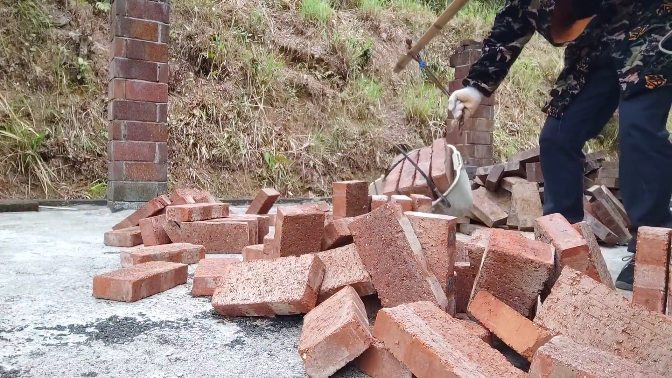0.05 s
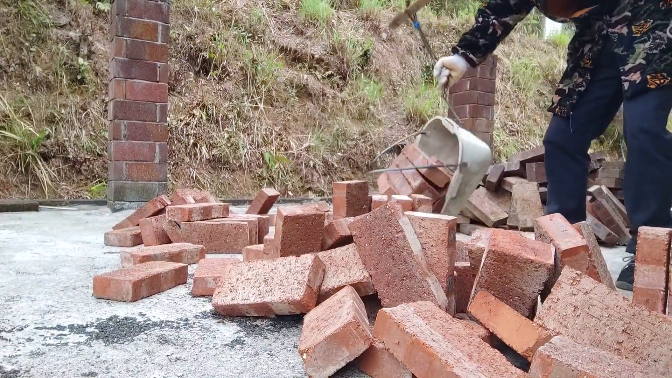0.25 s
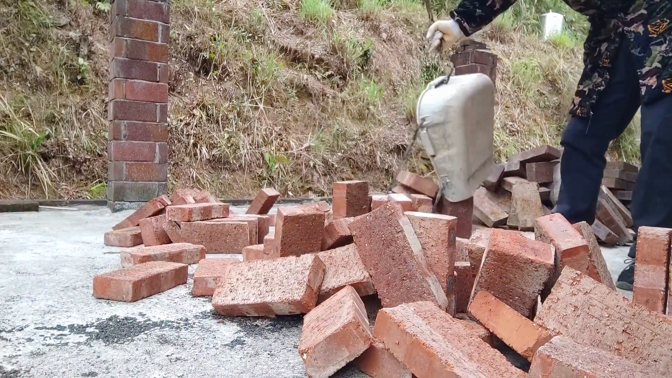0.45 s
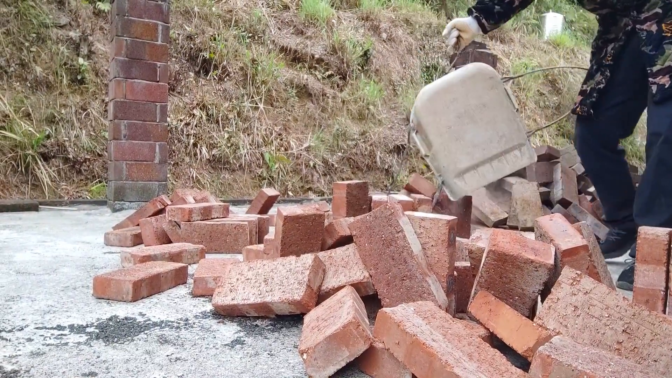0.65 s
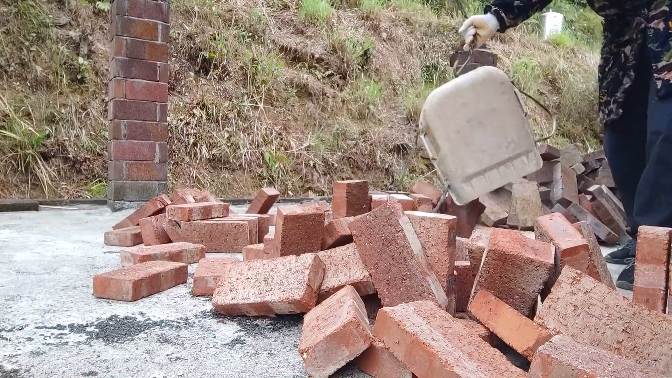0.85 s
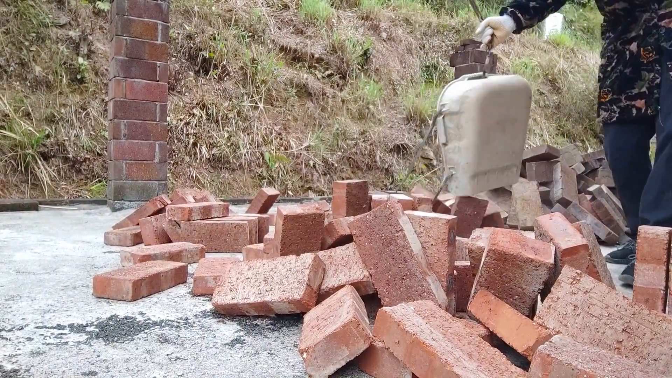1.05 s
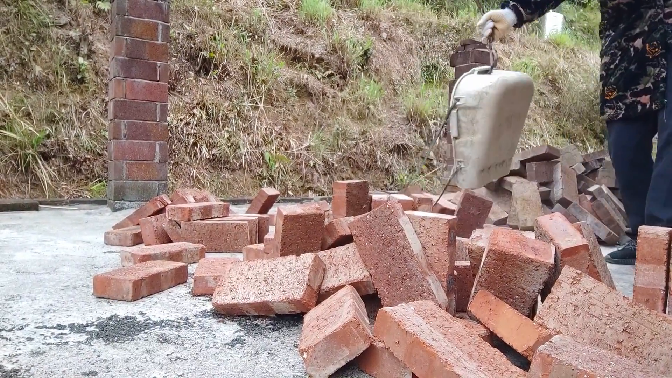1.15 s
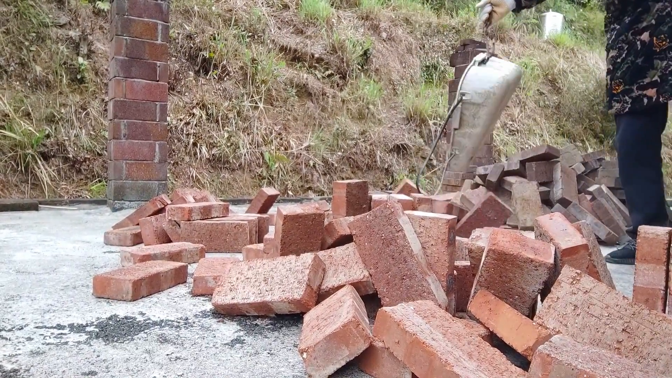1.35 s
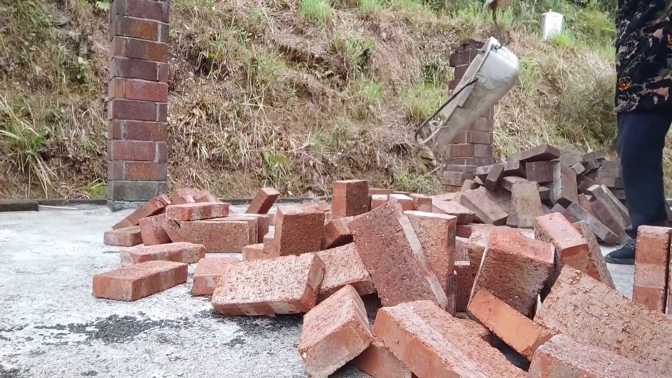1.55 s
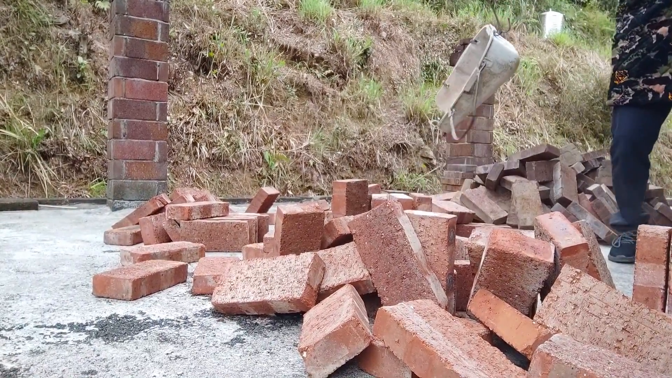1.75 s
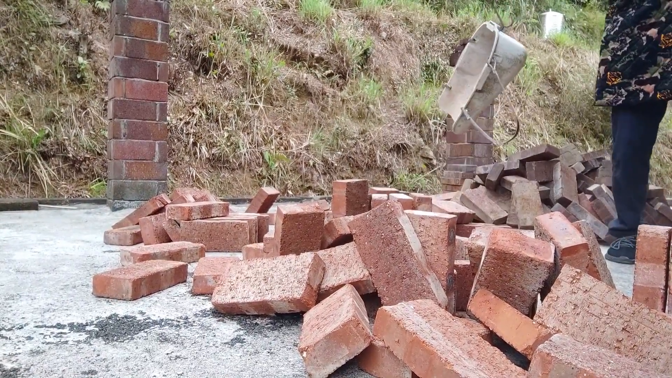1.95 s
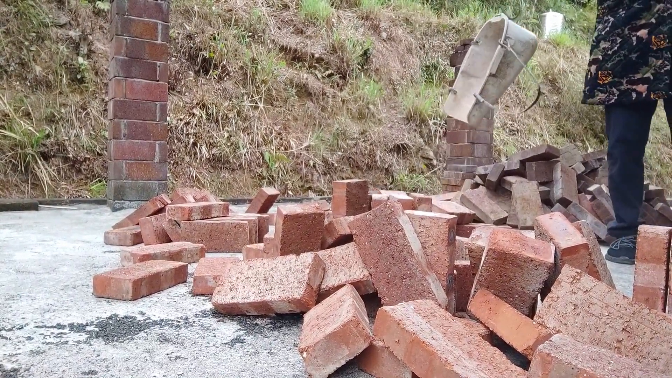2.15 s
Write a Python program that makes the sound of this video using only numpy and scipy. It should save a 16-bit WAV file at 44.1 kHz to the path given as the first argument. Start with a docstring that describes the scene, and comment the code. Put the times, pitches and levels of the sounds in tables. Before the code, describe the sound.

Bricks dumped from a basket: a short rough slide with chattering edges, a dense hard clatter, then separate dull knocks, faint ringing clinks, crumbs and hollow basket rumble, outdoors, close, slightly right, with low wind.

```python
"""Roofed yard: a basket of clay bricks is tipped onto a brick pile, a little to the right.
The load scrapes and groans out (filtered grains, sagging tones); bricks clink and thud (decaying modes, noise).
Grit patters after them and the hollow basket rumbles (random grains through resonances).
A light wind buffets the microphone (low noise, puffs) over still air; noise tails give the reflections."""
import sys
import numpy as np
from scipy import signal
from scipy.fft import rfft, irfft
from scipy.io import wavfile

SR = 44100
rng = np.random.default_rng(int(sys.argv[2]) if len(sys.argv) > 2 else 0)


def pcm_store(signal):
    """Save signal as 16-bit PCM."""
    levels = np.round(np.clip(np.atleast_2d(signal), -1, 1) * 32767)
    wavfile.write(sys.argv[1], SR, levels.astype(np.int16).T)


N = 94815
T = np.arange(N) / SR
ONE_S = T[:SR]


def from_db(db):
    """Decibels to gain."""
    return 10 ** (np.asarray(db) / 20)


def rms_one(x):
    """Scale to an rms of 1."""
    return x / np.sqrt(np.mean(x ** 2) + 1e-20)


def level(rows):
    """Gain over time from (time_s, level_db) rows, linear in dB between them."""
    return from_db(np.interp(T, *np.transpose(rows)))


def at_hz(points, hz):
    """Interpolate (freq_hz, value) rows on a log-frequency axis."""
    freq_hz, values = np.transpose(points)
    return np.interp(np.log(np.maximum(hz, 1)), np.log(freq_hz), values)


def colour(x, spectrum):
    """Weight the spectrum of x by (freq_hz, level_db) rows; rms 1."""
    size = x.shape[-1]
    gain = from_db(at_hz(spectrum, np.fft.rfftfreq(size, 1 / SR)))
    return rms_one(irfft(rfft(x) * gain, size))


def add(out, start_s, x):
    """Mix x into out from start_s on."""
    i = max(int(start_s * SR), 0)
    out[i:i + len(x)] += x[:N - i]


def low_pass(x, hz):
    """Second-order low-pass."""
    return signal.sosfilt(signal.butter(2, min(hz, SR / 3), fs=SR, output="sos"), x)


def waver(hz):
    """Random fluctuation, low-passed at hz; rms 1."""
    return rms_one(low_pass(rng.standard_normal(N), hz))


def dying_noise(spectrum, t60s):
    """One second of coloured noise, rms 1 before decay; each octave band dies at its own rate."""
    bins = rfft(colour(rng.standard_normal(SR), spectrum))
    hz = np.fft.rfftfreq(SR, 1 / SR)
    octave = np.clip(np.round(np.log2(np.maximum(hz, 1) / 100)), 0, 7)
    out = np.zeros(SR)
    for k in range(8):
        band = irfft(bins * (octave == k), SR)
        out += band * from_db(-60 * ONE_S / at_hz(t60s, 100 * 2 ** k))
    return out


def grains(per_s, spread_db):
    """Tiny contacts: impulses at random times, of uneven size and random sign."""
    sizes = from_db(spread_db * np.minimum(rng.exponential(1, N), 4))
    hits = rng.random(N) < per_s / SR
    return hits * sizes * rng.choice([-1, 1], N) + 1e-18


def resonate(x, rows):
    """Parallel resonances of alternating sign from (freq_hz, width_hz, level_db) rows; rms 1."""
    out = np.zeros(N)
    for k, (hz, width_hz, db) in enumerate(rows):
        b, a = signal.iirpeak(hz, hz / width_hz, fs=SR)
        out += (-1) ** k * from_db(db) * rms_one(signal.lfilter(b, a, x))
    return rms_one(out)


# still-air spectrum: freq_hz, level_db
AIR_SPECTRUM = [(100, 3.5), (500, 7.5), (1200, -1.5), (3000, -4), (7500, -3), (9000, -17.5), (13000, -5),
                (15500, -30.5)]
AIR_DB = -57


def still_air():
    """Steady coloured noise, independent in each channel."""
    return from_db(AIR_DB) * colour(rng.standard_normal((2, N)), AIR_SPECTRUM)


# wind course: time_s, level_db (before WIND_GAIN_DB)
WIND_LEVEL = [(0, -37.5), (.1, -44), (.3, -45), (.7, -38.5), (1.1, -34), (1.4, -34), (1.6, -35.5),
              (1.85, -30), (1.97, -38.5), (2.15, -40)]
# wind spectrum: freq_hz, level_db
WIND_SPECTRUM = [(8, -18.5), (18, -6), (30, -2), (70, -4), (120, -10.5), (250, -24), (600, -50),
                 (2000, -74.5)]
# puffs in the right channel: centre_s, peak_db
PUFFS = [(1.391, -10), (1.622, -6.5), (1.646, -13), (1.787, -11.5)]
WIND_GAIN_DB, WIND_SHARED_GAIN, PUFF_WIDTH_S = 9.5, 0.32, 0.0021


def wind():
    """Turbulence on the microphone: low noise partly common to both channels, puffs that pop on the right."""
    white = rng.standard_normal((2, N)) + WIND_SHARED_GAIN * rng.standard_normal(N)
    out = level(WIND_LEVEL) * from_db(WIND_GAIN_DB) * colour(white, WIND_SPECTRUM)
    for centre_s, peak_db in PUFFS:
        u = ((T - centre_s) / PUFF_WIDTH_S) ** 2
        out[1] += from_db(peak_db) * (1 - u) * np.exp(-u / 2)
    return out


# rumble of the handled basket: time_s, level_db
RUMBLE_LEVEL = [(0, -42), (.1, -43), (.2, -31), (.4, -28), (.52, -28.5), (.58, -24), (.76, -36),
                (.85, -29.5), (1.0, -28.5), (1.2, -31), (1.28, -27), (1.42, -29.5), (1.5, -36.5),
                (1.62, -25), (1.75, -32), (1.88, -30.5), (1.97, -52), (2.15, -33.5)]
# resonances of the hollow basket: freq_hz, width_hz, level_db
BASKET_RESONANCES = [(78.2, 73, -3), (132, 66, 0.5), (190.5, 49, -0.5), (272, 110, -5), (375, 92, -7),
                     (430, 67, -12)]
FLEXES_PER_S = 460


def basket():
    """Soft flexes of the basket wall excite its low resonances."""
    flexes = grains(FLEXES_PER_S, spread_db=3.5)
    hollow = rms_one(low_pass(resonate(flexes, BASKET_RESONANCES), hz=515))
    return level(RUMBLE_LEVEL) * hollow


# run of grit and crumbs: time_s, level_db
GRIT_LEVEL = [(0, -68), (.2, -53.5), (.5, -45), (.6, -46), (.76, -49.5), (.82, -39), (.92, -47),
              (1.03, -47), (1.16, -42.5), (1.205, -36.5), (1.25, -41.5), (1.33, -42), (1.41, -50.5),
              (1.48, -48), (1.56, -50), (1.7, -59.5), (1.9, -70.5)]
# bricks ringing under the grit: freq_hz, width_hz, level_db
GRIT_RESONANCES = [(2310, 180, -2), (2861, 41, 1), (3082, 50, -6.5), (4430, 250, -12), (5656, 220, -13.5)]
# grit hiss spectrum: freq_hz, level_db
GRIT_SPECTRUM = [(400, 8), (1300, 2), (2600, 1.5), (3700, -10.5), (5500, -19), (7800, -11.5), (9000, -25),
                 (14000, -17.5)]
GRIT_PER_S, GRIT_SPREAD_DB, GRIT_HISS_DB = 1800, 1.5, -0.5
GRIT_FLICKER_RMS_DB, GRIT_FLICKER_HZ = 3.5, 35.3


def grit():
    """Crumbs patter in uneven spurts on the bricks and keep them ringing faintly."""
    spurts = from_db(GRIT_FLICKER_RMS_DB * waver(GRIT_FLICKER_HZ))
    crumbs = grains(GRIT_PER_S, GRIT_SPREAD_DB) * spurts
    ringing = resonate(crumbs, GRIT_RESONANCES)
    hiss = from_db(GRIT_HISS_DB) * colour(crumbs, GRIT_SPECTRUM)
    return level(GRIT_LEVEL) * (ringing + hiss)


# short rubs of basket and bricks: peak_s, length_s (peak to -17 dB), level_db, centre_hz,
# half_width_octaves (to -3 dB)
RUB_EVENTS = [(0.098, 0.043, -41.5, 596, 0.58), (0.63, 0.02, -36, 1290, 0.65),
              (1.196, 0.024, -44, 12400, 1), (1.2, 0.0057, -27, 1380, 0.18), (1.484, 0.052, -48, 4450, 0.5),
              (1.596, 0.015, -43, 1550, 0.65)]
SCRAPE_GRAINS_PER_S, SCRAPE_SPREAD_DB = 5000, 2


def rubs():
    """Friction: brief grainy swells, each in its own register."""
    out, hz = np.zeros(N), np.geomspace(50, 16000, 60)
    for peak_s, length_s, db, centre_hz, half_width_octaves in RUB_EVENTS:
        offset = np.log2(hz / centre_hz) / half_width_octaves
        spectrum = np.transpose([hz, np.maximum(-3 * offset ** 2, -60)])
        friction = colour(grains(SCRAPE_GRAINS_PER_S, SCRAPE_SPREAD_DB), spectrum)
        swell = np.exp(-2 * ((T - peak_s) / length_s) ** 2)
        out += from_db(db) * swell * friction
    return out


# load scraping along the basket wall: time_s, level_db
SLIDE_LEVEL = [(0, -48), (.185, -47.5), (.21, -32), (.24, -26), (.275, -26), (.3, -26.5), (.33, -23),
               (.354, -29.5), (.372, -23.5), (.395, -26), (.415, -26.5), (.435, -31), (.48, -28),
               (.52, -46.5), (.56, -76), (.7, -63)]
# scrape spectrum: freq_hz, level_db
SCRAPE_SPECTRUM = [(150, -9.5), (350, 10.5), (800, -3), (1500, -4.5), (2400, -2), (3500, -6.5), (5000, -17),
                   (9000, -27.5), (13000, -27.5), (16000, -20)]
# brick edges chattering: freq_hz, width_hz, level_db
RATTLE_RESONANCES = [(1340, 110, 1), (1840, 180, -3.5), (2330, 150, -0.5), (2800, 170, -7),
                     (4300, 200, -10.5)]
# stick-slip groans of the basket: start_s, length_s (release starts halfway), level_db, start_hz,
# sag_octaves_per_s
SLIP_EVENTS = [(0.122, 0.14, -33.5, 525, 5.5), (.232, 0.024, -18.5, 511, 7), (0.261, 0.039, -21, 399.6, 5),
               (0.309, 0.073, -15, 437.3, 7), (0.358, 0.024, -10.5, 413.3, 7.5),
               (0.385, 0.011, -9.5, 317, 6.5), (0.776, 0.15, -31, 375, 0), (0.882, 0.023, -21, 350, 3.5),
               (0.942, 0.033, -29.5, 375, 1), (1.012, 0.04, -30.5, 352, -3), (1.272, 0.048, -28.5, 430, 2)]
RATTLE_PER_S, RATTLE_SPREAD_DB, RATTLE_DB = 220, 4.5, -10
CATCH_RMS_DB, CATCH_HZ = 2.5, 130
SLIP_PITCH_JITTER, SLIP_FLUTTER = .08, .35  # rms, relative
SLIP_ATTACK_S, SLIP_RELEASE_S = 0.0059, 0.014


def slide():
    """Rough clay scrapes, catches and chatters out of the basket, which groans with each slip."""
    rattle = from_db(RATTLE_DB) * resonate(grains(RATTLE_PER_S, RATTLE_SPREAD_DB), RATTLE_RESONANCES)
    catches = from_db(CATCH_RMS_DB * waver(CATCH_HZ))
    scrape = colour(catches * grains(SCRAPE_GRAINS_PER_S, SCRAPE_SPREAD_DB), SCRAPE_SPECTRUM)
    out = level(SLIDE_LEVEL) * (scrape + rattle)
    t = T[:SR // 4]
    for start_s, length_s, db, start_hz, sag in SLIP_EVENTS:
        wobble, flutter = rms_one(low_pass(rng.standard_normal((2, len(t))), hz=154))
        pitch_hz = start_hz * 2 ** (-sag * t) * (1 + SLIP_PITCH_JITTER * wobble)
        attack = np.minimum(t / SLIP_ATTACK_S, 1)
        release = np.exp(-np.maximum(t - length_s / 2, 0) / SLIP_RELEASE_S)
        groan = (1 + SLIP_FLUTTER * flutter) * np.sin(2 * np.pi * np.cumsum(pitch_hz) / SR)
        add(out, start_s, from_db(db) * attack * release * groan)
    return out


# brick on brick: start_s, ring_db, pitch_factor, t60_s, tilt_db_per_octave, crack_db
CLINK_EVENTS = [(0.0367, -32, .9, 0.033, -4, -44), (0.2088, -36, .8, 0.02, 0, -35),
                (0.2374, -15.5, 1.4, 0.023, 6, -34.5), (0.2601, -29, 1.1, 0.023, 2, -31),
                (0.3095, -13, 0.95, 0.034, 4, -25.5), (0.3259, -17.5, 1.04, 0.017, 17, -22.5),
                (0.361, -18.5, 0.9, 0.026, -5, -21.5), (0.373, -13.5, 0.95, 0.033, 7, -33),
                (0.387, -23, 0.96, .025, 2, -19.5), (0.4257, -2.5, .99, 0.069, -20, -10.5),
                (0.4355, -6, 0.98, .05, -1.5, -17), (0.443, -13, 1.15, 0.05, -2, -19),
                (0.4506, -14.5, 1.2, 0.058, -2, -25), (0.6441, -31, 1.0, 0.22, 7, -35),
                (0.949, -43.5, 1.18, 0.32, 3, -43), (1.0291, -35.5, .6, 0.07, -25, -46.5),
                (1.114, -36, 1.28, 0.14, -4, -34.5), (1.197, -32.5, 1.18, 0.13, 13, -29),
                (1.218, -32, 1.25, 0.043, 4.5, -42.5), (1.2913, -27, 0.94, 0.27, 8.5, -34.5),
                (1.3335, -17.5, 0.908, 0.12, 17, -29.5), (1.5068, -24, 0.99, 0.2, -1, -32.5),
                (1.6583, -27.5, 1.222, 0.1, -11, -37.5)]
# brick modes: freq_hz (before pitch_factor), level_db (re ring_db)
BRICK_MODES = [(1860, -12), (1950, -14.5), (2379, -3), (2435, -23.5), (2880, -19), (3280, -24.5)]
# crack spectrum: freq_hz, level_db
CRACK_SPECTRUM = [(500, -9), (1100, -1), (2000, 1), (3000, 0), (4000, -18), (8000, -38), (15000, -37)]
TILT_PIVOT_HZ = 2379
CRACK_T60_S, SNAP_T60_S, SNAP_GAIN = 0.028, .012, 1.2
ROCKING_RMS, ROCKING_HZ = .22, 90
CLINK_RISE_S = 0.00067


def clinks():
    """A snap and gritty crack together with the ringing modes of a brick, rough as it rocks on its neighbours."""
    out, t = np.zeros(N), ONE_S
    contact = from_db(-60 * t / CRACK_T60_S) + SNAP_GAIN * from_db(-60 * t / SNAP_T60_S)
    rise = 1 - np.exp(-(t / CLINK_RISE_S) ** 2)
    for start_s, ring_db, pitch, t60_s, tilt, crack_db in CLINK_EVENTS:
        ring = np.zeros(SR)
        for hz, mode_db in BRICK_MODES:
            tilt_db = tilt * np.log2(hz / TILT_PIVOT_HZ)
            decay = from_db(ring_db + mode_db + tilt_db - 60 * t / t60_s)
            ring += decay * np.sin(2 * np.pi * hz * pitch * t + rng.uniform(0, np.pi))
        crack = colour(rng.standard_normal(SR), CRACK_SPECTRUM) * from_db(crack_db) * contact
        rocking = 1 + ROCKING_RMS * waver(ROCKING_HZ)[:SR]
        add(out, start_s, (ring * rocking + crack) * rise)
    return out


# dull landings and knocks: start_s, level_db (body and clatter), bright_hz (low-pass), pitch_factor,
# clatter_offset_db (added to CLATTER_DB)
THUD_EVENTS = [(0.051, -22.5, 495, 1.08, 4.5), (0.151, -24.5, 1200, 1.34, -8), (0.4217, -5, 500, 0.96, -4),
               (0.4264, -10.5, 2960, 2.53, -1.5), (0.4365, -3, 1800, 0.93, -1.5),
               (0.4653, -0.5, 995, 0.925, -1.5), (0.4812, 0, 680, .95, -2.5), (0.645, 0, 1200, 1.066, -2),
               (0.983, -10, 220, 1.08, -4), (1.0651, -0.5, 970, 1.04, -1.5),
               (1.1128, -6.5, 1800, 1.16, 0.5), (1.1534, -4, 1280, 0.83, -2),
               (1.2392, -1.5, 239, 0.98, -0.5), (1.264, -15.5, 1120, 1.43, 3.5),
               (1.305, -7, 250, 0.96, 2.5), (1.329, -2.5, 1900, 1.016, -0.5),
               (1.5052, -17.5, 1300, 2.5, -5.5), (1.549, -6.5, 250, 0.94, -1),
               (1.6571, 0.5, 1610, 1.12, -5.5), (1.784, -16, 247, 1.2, -6), (1.826, -8, 120, 0.6, -18)]
# heavy, well damped knock: freq_hz (before pitch_factor), level_db, t60_s
KNOCK_MODES = [(134.5, -1.5, 0.046), (200.2, 2, 0.061), (299.6, 1.5, 0.033), (430, -7, 0.039),
               (653, -4, 0.018), (879, -4, 0.017), (1200, -10, 0.013), (2500, -22.5, 0.012)]
# pile shudder spectrum: freq_hz, level_db
CLATTER_SPECTRUM = [(60, -20), (130, -4.5), (250, 4.5), (500, 1.5), (850, -0.5), (1400, -11.5),
                    (2800, -17.5), (4000, -27.5), (15000, -43.5)]
# pile shudder decay: freq_hz, t60_s
CLATTER_DECAY = [(100, 0.096), (400, 0.11), (1000, 0.075), (3000, 0.086), (12000, .05)]
BODY_DB, CLATTER_DB, CLATTER_RISE_S = -5.5, -6.5, 0.0055


def thuds():
    """Each landing rings damped modes and shakes the pile; each has its own brightness, from dull to clear."""
    out, t = np.zeros(N), ONE_S
    for start_s, db, bright_hz, pitch, clatter_offset_db in THUD_EVENTS:
        body = np.zeros(SR)
        for k, (hz, mode_db, t60_s) in enumerate(KNOCK_MODES):
            decay = from_db(mode_db - 60 * t / t60_s)
            body += (-1) ** (k + 1) * decay * np.sin(2 * np.pi * hz * pitch * t)
        shudder = dying_noise(CLATTER_SPECTRUM, CLATTER_DECAY) * (1 - np.exp(-t / CLATTER_RISE_S))
        landing = from_db(BODY_DB) * body + from_db(CLATTER_DB + clatter_offset_db) * shudder
        add(out, start_s, from_db(db) * low_pass(landing, bright_hz))
    return out


# far reflections: freq_hz, level_db
YARD_SPECTRUM = [(60, -37.5), (200, -3.5), (900, 0.5), (2700, 1.5), (5000, -10), (15000, 4)]
# far reflection decay: freq_hz, t60_s
YARD_DECAY = [(100, 0.75), (500, 0.51), (2500, 0.31), (6000, 0.25), (15000, 0.26)]
# quick reflections off the pile: freq_hz, level_db
SCATTER_SPECTRUM = [(100, -26.5), (400, -9), (1000, -4.5), (2500, -7), (5000, 2.5), (15000, -2.5)]
YARD_DB, YARD_RISE_S = -15.5, .014
SCATTER_DB, SCATTER_T60_S = -1.5, 0.038
LEFT_LAG_S, PAN_DB = .00009, 0.53  # pan: right up, left down


def yard(x):
    """Direct sound leads on the right; the pile scatters at once, the yard's answer builds up and lasts longer."""
    left = from_db(-PAN_DB) * np.interp(T - LEFT_LAG_S, T, x)
    out = np.array([left, from_db(PAN_DB) * x])
    for side in out:
        far = dying_noise(YARD_SPECTRUM, YARD_DECAY) * (1 - np.exp(-ONE_S / YARD_RISE_S))
        near = colour(rng.standard_normal(SR), SCATTER_SPECTRUM) * from_db(-60 * ONE_S / SCATTER_T60_S)
        echoes = from_db(YARD_DB) * far / np.linalg.norm(far)
        echoes += from_db(SCATTER_DB) * near / np.linalg.norm(near)
        side += signal.fftconvolve(x, echoes)[:N]
    return out


def scene():
    """Five groups with separate reflections (basket and rubs share theirs) over wind and still air."""
    out = still_air() + wind()
    for source in (basket() + rubs(), grit(), slide(), clinks(), thuds()):
        out += yard(source)
    return out


CUTOFF_HZ = 15550


def record(dry):
    """Round the highest peaks towards 0.95, then cut the top steeply."""
    rounded = dry / (1 + (dry / .95) ** 6) ** (1 / 6)
    return signal.sosfilt(signal.ellip(10, .2, 80, CUTOFF_HZ, fs=SR, output="sos"), rounded)


dry = scene()
out = record(dry)
pcm_store(out)
```